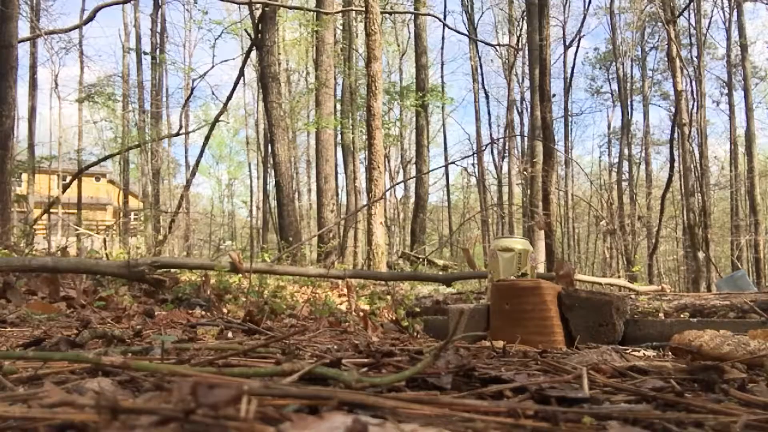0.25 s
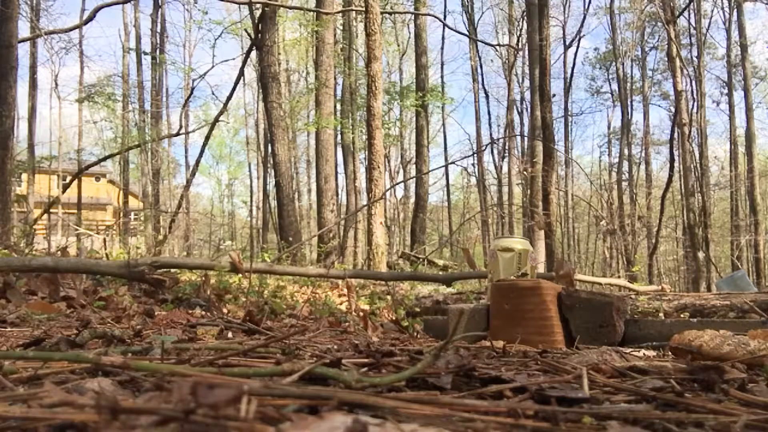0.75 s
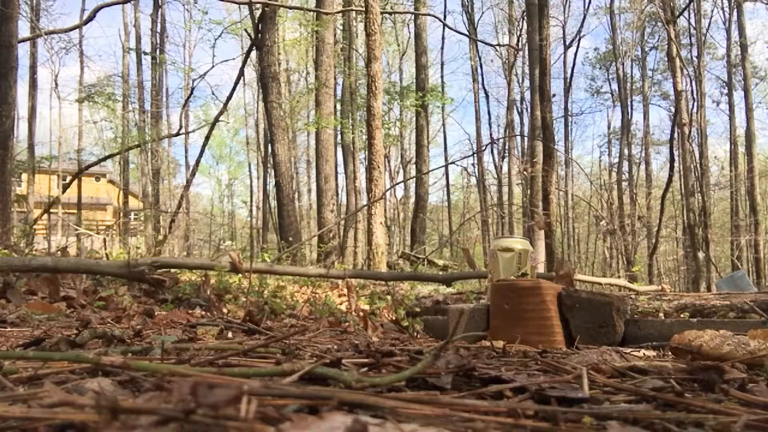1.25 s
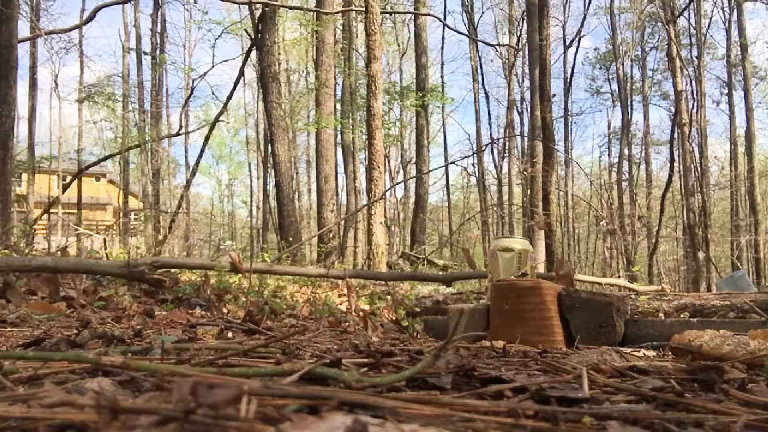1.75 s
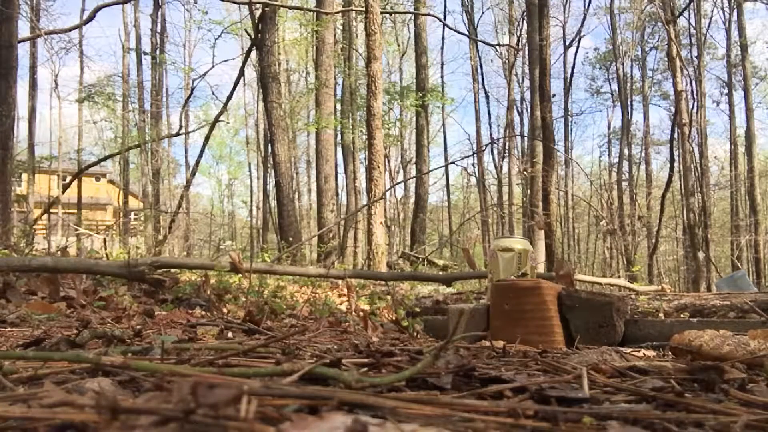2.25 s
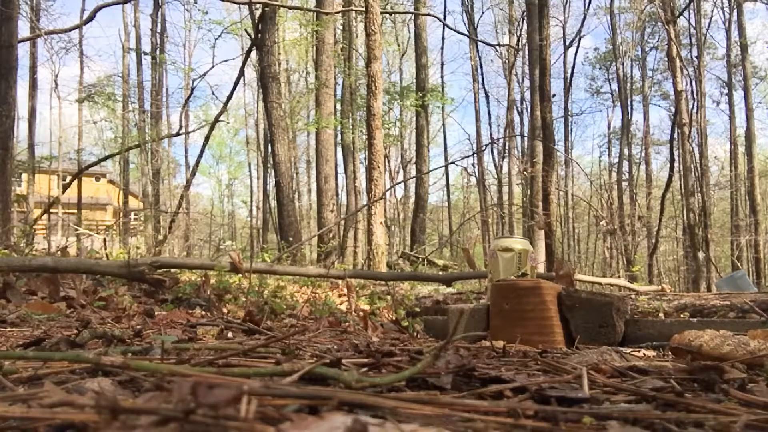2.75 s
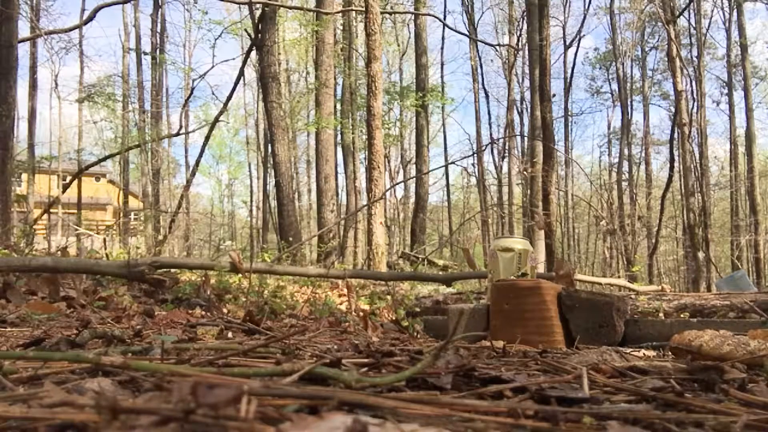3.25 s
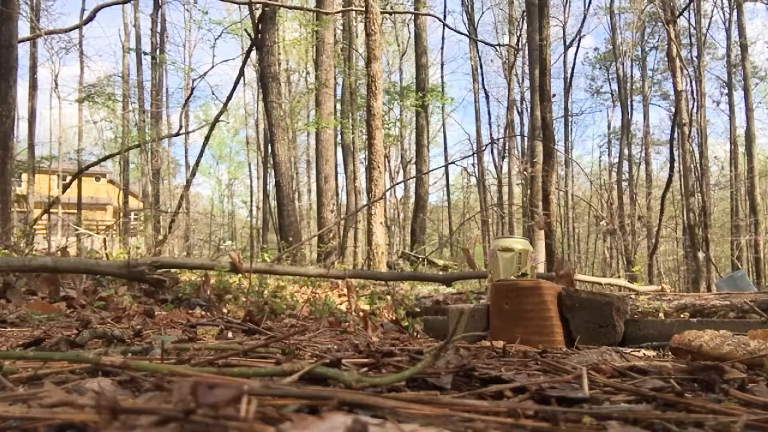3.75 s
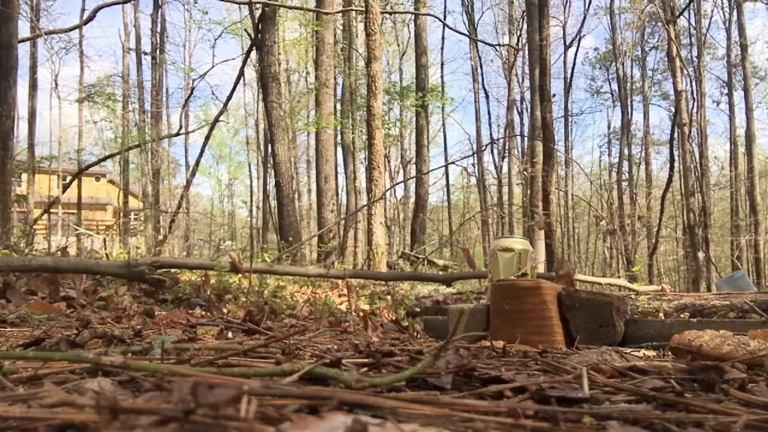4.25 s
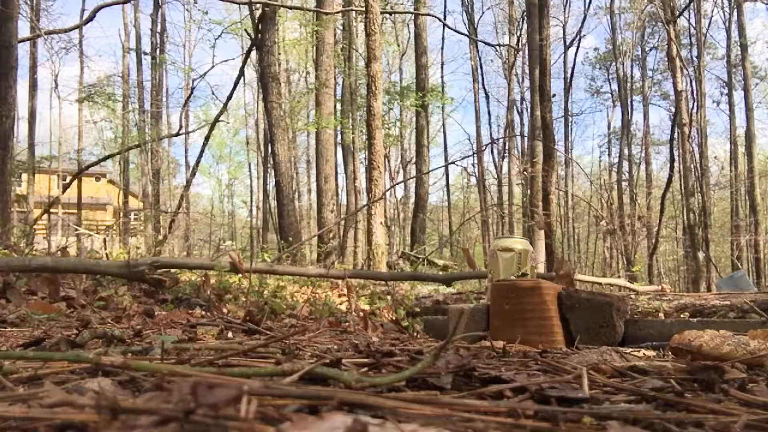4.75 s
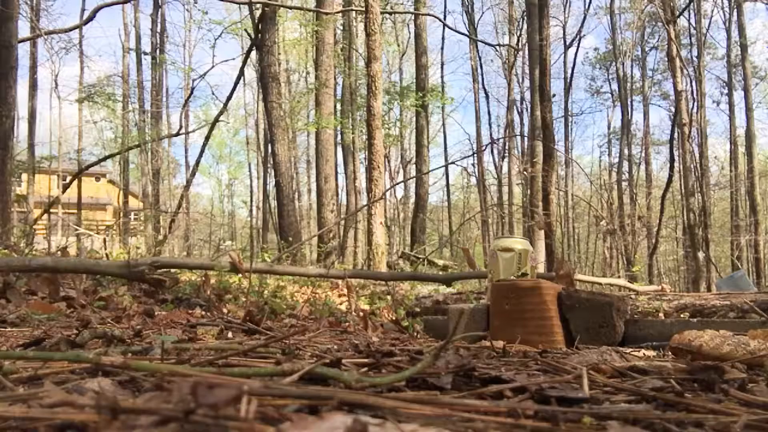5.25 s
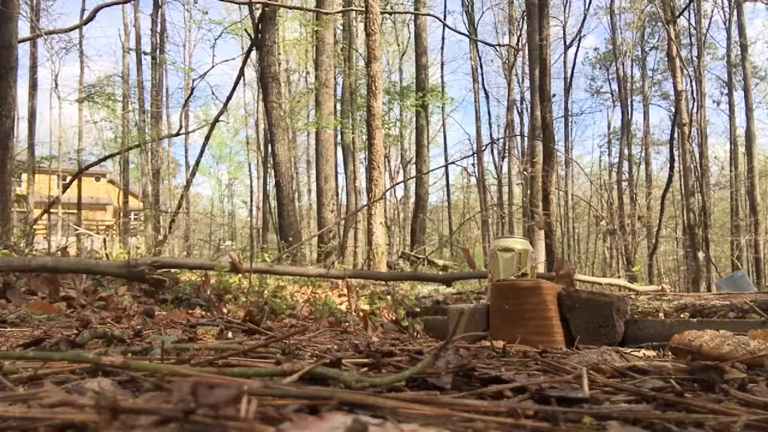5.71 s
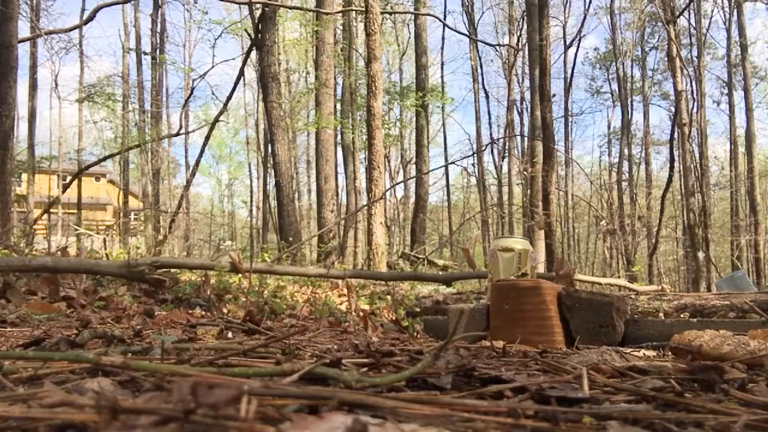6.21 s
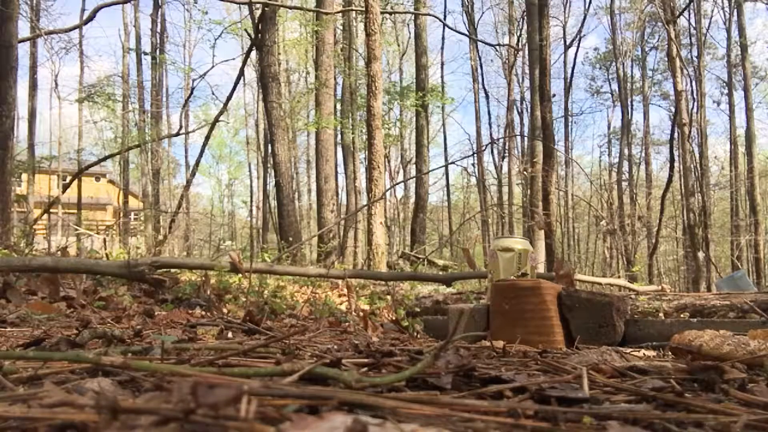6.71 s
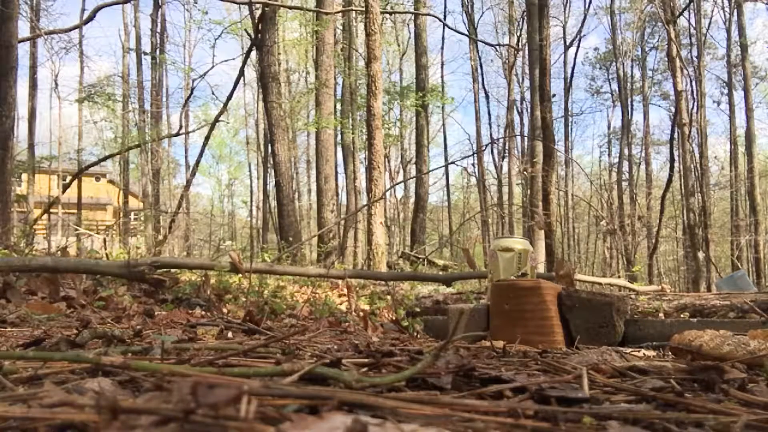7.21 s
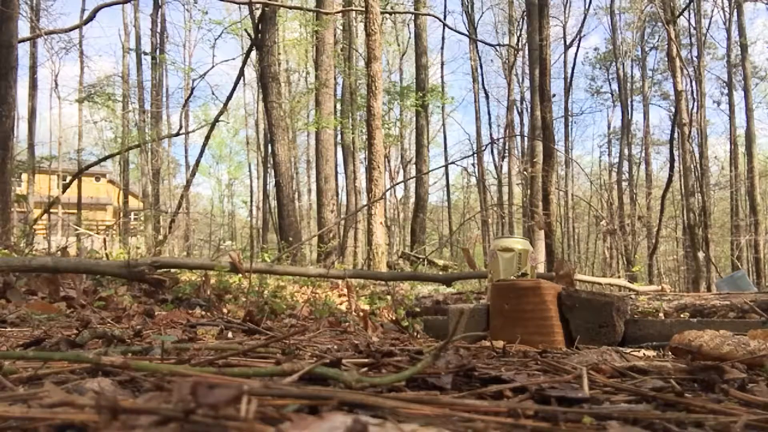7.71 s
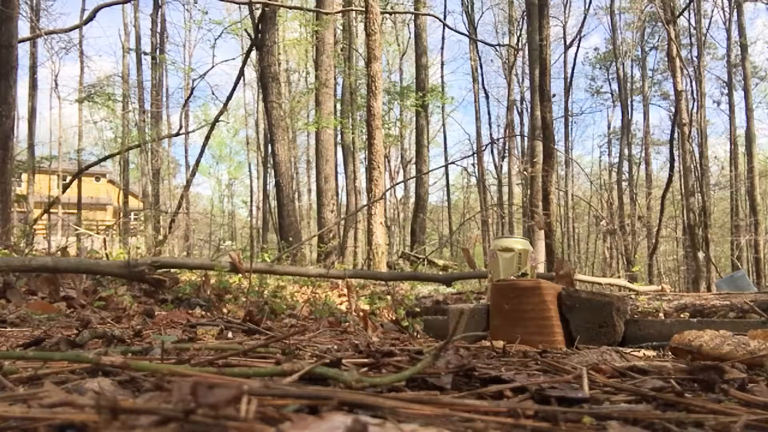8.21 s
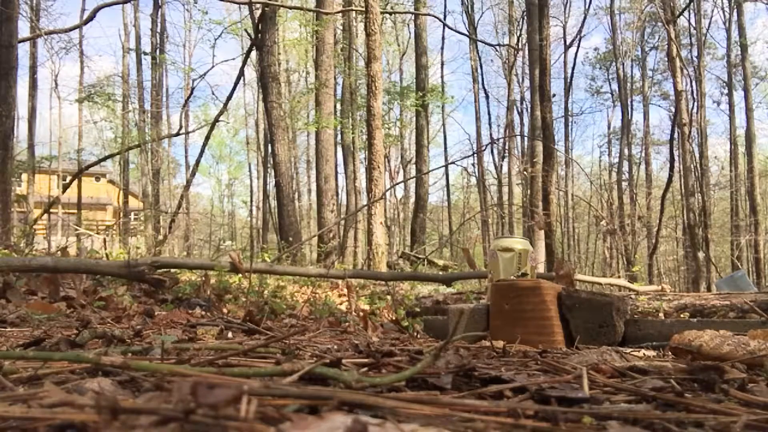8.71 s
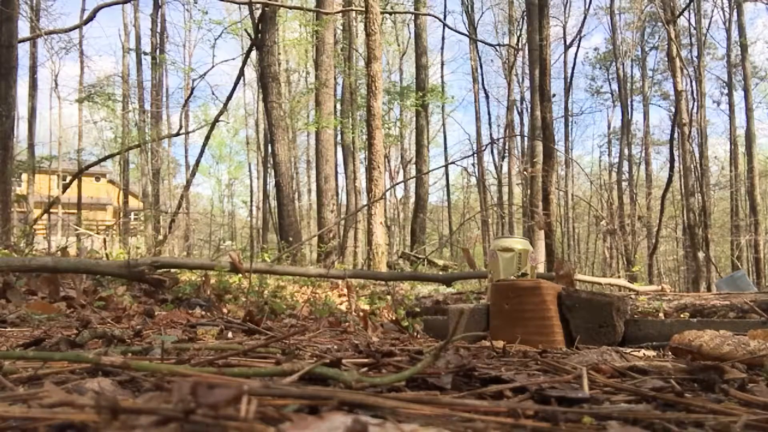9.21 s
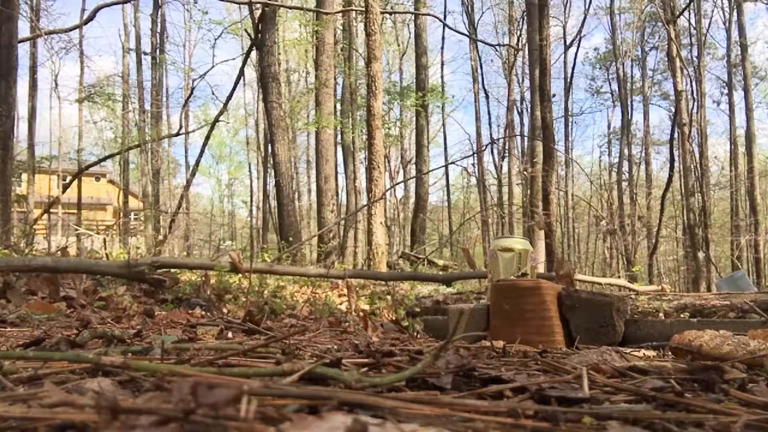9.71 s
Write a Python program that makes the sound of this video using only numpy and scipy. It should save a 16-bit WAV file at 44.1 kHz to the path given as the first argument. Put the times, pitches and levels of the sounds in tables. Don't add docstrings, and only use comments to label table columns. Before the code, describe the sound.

Quiet woodland with soft distant traffic rumble and faint birds. At 0.3 s an air pistol fires close to a small microphone: a tiny hiss, then two extremely sharp, bright cracks about 25 milliseconds apart with a short low puff. Trunks throw back rapid slaps, a duller far return comes near 0.55 s, and a faint tail thins out. Pure, held bird whistles sound at 0.7, 1.0 and 1.25 s, with tiny dry twig ticks around 1.2-1.6 s. Soft handling clicks come at 1.7, 1.9, 3.1, 3.8, 4.3 and 4.6 s; the strongest cluster, at 5.2-5.4 s, has light cloth rustles. Rasping birdsong occurs near 3.3, 5.2 and 7.6 s, and whistles return from 4.4 to 5.3 s. A gliding warble with buzzy trills fills 7.9-9 s while traffic swells slightly around 7.9 s. A small double click lands at 9.6 s.

```python
import sys
import numpy as np
from scipy import signal
from scipy.io import wavfile
from scipy.ndimage import uniform_filter1d

SR = 44100
rng = np.random.default_rng(int(sys.argv[2]) if len(sys.argv) > 2 else 0)


def persist_wave(psi):
    counts = np.round(np.clip(psi, -1, 1) * 32767).astype(np.int16)
    wavfile.write(sys.argv[1], SR, np.atleast_2d(counts).T)


def voltage_ratio(level):
    return 10 ** (np.asarray(level, float) / 20)


N = 439236


def evened(x):
    return x / np.sqrt(np.mean(x ** 2) + 1e-20)


def read(points, hz):
    f, value = np.transpose(points)
    return np.interp(np.log(hz + 1), np.log(f + 1), value)


def add(mix, s, sound):
    part = mix[round(s * SR):][:len(sound)]
    part += sound[:len(part)]


def noise(field_db, length, size):
    frames = length * 4 // size + 6
    hz = np.fft.rfftfreq(size, 1 / SR)[:, None]
    t = np.arange(frames) * size / 4 / SR
    a, b = rng.standard_normal((frames, len(hz), 2)).T
    spectra = (a + 1j * b) * voltage_ratio(field_db(hz, t))
    return signal.istft(spectra, nperseg=size, noverlap=size * 3 // 4)[1][:length]


def flutter(length, span_s):
    width = max(round(span_s * SR), 1)
    smooth = uniform_filter1d(rng.standard_normal(length), width)
    return evened(uniform_filter1d(smooth, width))


def ring(hz, t60, t, onset=0.000083):
    return np.sin(2 * np.pi * hz * t) * voltage_ratio(-60 * t / t60) * (1 - np.exp(-(t / onset) ** 2))


def swelling_ring(hz, t60, t):
    return ring(hz, t60, t, .45 / hz)


def crack(db, hz, t60, fizz_db):
    t = np.arange(SR // 5) / SR
    fizz_band = signal.butter(2, [5970, 13800], "band", fs=SR, output="sos")
    fizz = evened(signal.sosfilt(fizz_band, rng.standard_normal(len(t))))
    fizz = fizz * voltage_ratio(fizz_db - 3.5 - 60 * t / 0.0064)
    undertone = voltage_ratio(-5.5) * swelling_ring(0.73 * hz, t60, t)
    return fizz + voltage_ratio(db) * (swelling_ring(hz, t60, t) + undertone)


def sing(rows, sweep=0, depth_db=4.0, wander_hz=8):
    s, hz, db = np.transpose(rows)
    t = np.arange(s[0], s[-1], 1 / SR)
    slides_per_s = 110 * (1 + 0.6 * flutter(len(t), .007))
    slide = .5 - np.cumsum(slides_per_s) / SR % 1
    hz = np.interp(t, s, hz) + wander_hz * flutter(len(t), 0.0078)
    hz = hz + np.interp(t, s, sweep + 0 * s) * slide
    tone = np.sqrt(2) * np.sin(2 * np.pi * np.cumsum(hz) / SR)
    twinkle_db = depth_db * flutter(len(t), .01)
    soft_ends = signal.windows.tukey(len(t), min(0.036 * SR / len(t), 1))
    return s[0], voltage_ratio(np.interp(t, s, db) + twinkle_db) * tone * soft_ends


def chirp(s, length, first_hz, last_hz, db):
    bend_hz = first_hz + .75 * (last_hz - first_hz)
    rows = [(s, first_hz, db - 4.0), (s + length / 2, bend_hz, db), (s + length, last_hz, db - 3.5)]
    return sing(rows, depth_db=1.5)


def trees(x, t60, turns_per_s):
    t, out = np.arange(SR // 2) / SR, np.zeros(N)
    for k in range(3):
        tail = rng.standard_normal(len(t)) * voltage_ratio(-60 * t / t60)
        turn = np.cos(np.pi * (np.arange(N) * turns_per_s / SR + k / 3)) ** 2
        share = np.sqrt(4 / 3) * turn * np.sqrt(2 / 3)
        out += signal.oaconvolve(x * share, tail / np.linalg.norm(tail))[:N]
    return out


# (f/Hz, level/dB per Hz)
AIR_COLOUR = [(15, -48.5), (25, -17), (43, -6), (111, -3.5), (195, -19), (229, -19.5), (463, -29),
              (560, -30.5), (641, -31), (714, -31.5), (1790, -37.5), (2550, -37), (2840, -36.5),
              (6560, -49.5), (16000, -64.5)]
# (t/s, rumble level/dB, far chorus level/dB)
AIR_DRIFT = [
    (0, -1, 6.5),
    (1, -1.2, 2.5),
    (2.2, 0.13, -4),
    (4, -0.37, -1.5),
    (5.7, 0.27, 3),
    (7, 0, -.5),
    (8, 0.77, 0),
    (9.96, -2.5, -1),
]


def air():
    s, rumble_db, chorus_db = np.transpose(AIR_DRIFT)

    def field_db(hz, t):
        patches = rng.standard_normal((len(t), len(hz))).T
        patches = evened(uniform_filter1d(uniform_filter1d(patches, 8, 0), 16, 1))
        chorus = np.exp(-(np.log2(hz / 2800 + 1e-3) / 0.74) ** 2)
        rumble = 1 / (1 + (hz / 300.4) ** 2)
        passing = 6 * np.exp(-((t - 7.85) / .55) ** 2 - (np.log2(hz / 200 + 1e-3) / .4) ** 2)
        drift = rumble * np.interp(t, s, rumble_db) + chorus * np.interp(t, s, chorus_db)
        return passing + read(AIR_COLOUR, hz) + 0.97 * patches + drift

    return voltage_ratio(-55) * evened(noise(field_db, N, size=2048))


def buzz(s, length, db, hz, sweep_hz, first=1, last=1):
    rows = [(s, first * hz, db - 6.5), (s + .35 * length, hz, db), (s + length, last * hz, db - 9)]
    return sing(rows, sweep_hz, depth_db=1.0)


# (t/s, length/s, top level/dB, middle f/Hz, sweep f/Hz)
BUZZES_FAR = [(0, .3, -68, 2950, 1100), (0, .16, -70, 4300, 1600), (.14, .13, -76, 4800, 2000),
              (1.3, .7, -76, 2570, 300), (2.0, .9, -79, 2590, 400), (2.65, .8, -77, 2510, 400),
              (1.6, .7, -86, 6900, 800), (3.18, .3, -87, 7350, 500), (4.65, .12, -83, 6900, 400),
              (3.8, .45, -79, 2790, 250), (4.2, .35, -79, 2790, 280), (5.45, 1.2, -78, 2080, 500),
              (6.3, .35, -80, 3480, 220), (5.2, .5, -76, 3000, 1500), (5.8, .35, -78, 2900, 1500),
              (6.24, .3, -76, 2610, 200), (6.6, .5, -76, 2610, 220), (7.14, .22, -80, 2380, 250),
              (6.6, .4, -79, 3540, 260), (7.0, .2, -82, 3540, 200), (7.3, .25, -86, 6800, 900),
              (8.0, 1.1, -66, 2700, 900), (8.2, .75, -67, 2790, 320), (7.9, .3, -72, 2580, 350),
              (8.5, 1.0, -74, 3100, 600), (8.3, .9, -75, 2400, 400), (8.05, .55, -74, 4470, 2000),
              (8.62, .3, -74, 4200, 1500), (8.98, .35, -73, 4100, 1300), (8.8, 1.2, -67.5, 2750, 1100),
              (9.3, .65, -75, 4200, 1700), (9.14, .18, -88, 6780, 470), (8.95, .7, -82, 5200, 500)]
# (t/s, length/s, top level/dB, middle f/Hz, sweep f/Hz)
BUZZES_FALLING = [
    (3.66, .25, -76, 3500, 700),
    (3.6, .35, -76, 4200, 900),
    (4.48, .42, -69, 2980, 850),
]


def buzzes():
    out = np.zeros(N)
    for row in BUZZES_FAR:
        add(out, *buzz(*row))
    for row in BUZZES_FALLING:
        add(out, *buzz(*row, first=1.15, last=.9))
    return out


def chatter():
    out = np.zeros(N)
    low_hz, high_hz, level_db = 1940, 3400, -86
    for when, length, pitch, slur, size in rng.random((81, 5)):
        hz = low_hz * (high_hz / low_hz) ** pitch
        last_hz = hz * (.85 + .25 * slur)
        add(out, *chirp(when * N / SR, .03 + 0.053 * length, hz, last_hz, level_db + 4 * size))
    return out


# (t/s, peak level/dB, ring f/Hz, ring t60/s, fizz level/dB)
SHOT_CRACKS = [(0.2882, -34, 3197, .003, -75), (.2885, -41, 1898, .004, -80),
               (.2990, -41, 1551, 0.0065, -65), (0.3048, -37.5, 3502, .008, -50),
               (0.308, -28.5, 2603, .006, -45), (0.3095, -2.5, 3200, .0035, -27.5),
               (0.312, -17, 3300, .006, -30), (0.3133, -11, 7200, .004, -24.5),
               (.3138, -13, 4300, .004, -30), (.3145, -10, 3300, .006, -30.5),
               (0.3139, -11, 2800, .006, -23), (0.3179, -13, 2998, .008, -27.5),
               (0.3212, -8, 3201, .003, -36), (.3257, -20, 3503, .008, -26.5),
               (.3302, -18, 4500, .006, -26.5), (.3329, -3.5, 3212, .0025, -24),
               (0.334, -13.5, 4200, .004, -28), (0.3351, -6.5, 5800, 0.003, -18),
               (.3356, -3, 2400, .004, -30), (0.3385, -16.5, 2701, .008, -30), (0.34, -19, 2596, .008, -29),
               (.3450, -23.5, 4007, 0.0028, -38.5)]
# (t/s, peak level/dB, f/Hz, t60/s)
SHOT_BODY = [(.3094, -22, 1150, .007), (.3095, -12, 1750, .004), (.3110, -25, 640, .02),
             (.3105, -22, 500, .025), (.3110, -24, 390, .025), (.3375, -25, 480, .02),
             (.3136, -13, 1750, .018), (.3148, -18, 1200, .012), (.3157, -19, 1700, .012),
             (.3177, -14, 1750, .01), (.3330, -14, 1700, .009), (.3355, -10, 1420, .006),
             (.3390, -21, 1420, .02), (.3380, -24, 640, .015), (.3374, -15, 1010, .03)]
# (t/s, peak level/dB, f/Hz, t60/s)
SHOT_PUSHES = [
    (0.3107, -26, -300, 0.0073),
    (0.312, -13.5, 147, 0.051),
    (0.312, -12, 250, 0.024),
    (0.337, -18, 116.5, .028),
    (0.338, -23, 263, .02),
    (0.347, -31, 49.5, .08),
]


def shot():
    out, t = np.zeros(N), np.arange(SR // 5) / SR
    for s, db, hz, t60, fizz_db in SHOT_CRACKS:
        add(out, s, crack(db, hz, t60, fizz_db))
    for s, db, hz, t60 in SHOT_BODY:
        add(out, s, -voltage_ratio(db) * swelling_ring(hz, t60, t))
    for s, db, hz, t60 in SHOT_PUSHES:
        add(out, s, voltage_ratio(db) * ring(hz, t60, t))
    return out


def valve():
    out = np.zeros(N)
    start, end = .292, .3085
    hz, width_hz, db = 5700, 600, -48
    length = round((end - start) * SR)
    hiss = noise(lambda f, u: -12 * np.abs(f - hz) / width_hz + 0 * u, length, size=128)
    add(out, start, voltage_ratio(db) * evened(hiss) * np.linspace(.2, 1, length))
    return out


SCATTER_STARTS = [.3075, .33, .35, .541, .539, .45]
# (rms level/dB, rise/s, hold/s, factor on the wood's decay, tilt/dB per octave)
SCATTER_RETURNS = [
    (-27, .003, 0.033, 0.046, 3.5),
    (-41, 0.011, 0.043, 0.36, 3),
    (-46, .04, 0.13, 0.87, 1),
    (-46, .012, .07, .8, -1.3),
    (-50, .005, .016, .12, 1.5),
    (-58.5, 0.35, 0.21, 3.26, -1.5),
]
# (f/Hz, level/dB per Hz)
SCATTER_COLOUR = [(180, -46.5), (300, -17.5), (440, -17), (502, -11), (537, -13), (614, -14.5), (978, -4.5),
                  (1530, 0), (2930, -0.5), (4830, -8), (6100, -6.5), (8360, -20.5), (12900, -33.5),
                  (16000, -38)]
# (f/Hz, t60/s)
WOOD_DECAY = [(300, 0.82), (1000, 1.2), (2500, 1.15), (5000, 0.79), (8000, 0.65), (10000, 0.73),
              (15000, 1.8)]


def returns():
    out, t = np.zeros(N), np.arange(2 * SR) / SR
    for s, (db, rise, hold, factor, tilt_db) in zip(SCATTER_STARTS, SCATTER_RETURNS):

        def field_db(hz, u):
            colour = read(SCATTER_COLOUR, hz) + tilt_db * np.log2(hz / 2500 + .01)
            decay = -60 * np.maximum(u - hold, 0) / (factor * read(WOOD_DECAY, hz))
            gate = -12 * (hz > 8600) * (s + u > .75)
            return colour + decay + gate

        tail = noise(field_db, len(t), size=128)
        tail = tail * voltage_ratio(1.3 * flutter(len(t), .002))
        add(out, s, voltage_ratio(db) * tail / np.std(tail[:600]) * np.minimum(t / rise, 1))
    return out


# (t/s, peak level/dB)
TRUNK_ECHOES = [(.3607, -17.5), (.3655, -15.5), (.3700, -23), (.3762, -26), (.3833, -26.5), (.3864, -19.5),
                (.3924, -27.5), (.4064, -26), (.4098, -34), (.4127, -31), (.4252, -28), (.4298, -34),
                (.4566, -32.5), (.5025, -32.5), (.5430, -30), (.5470, -34), (.5530, -33)]


def trunks():
    out = np.zeros(N)
    for s, db in TRUNK_ECHOES:
        hz = 2771 * (1 + 0.18 * rng.uniform(-0.74, 1))
        add(out, s, crack(db, hz, 0.0034, db - 27))
    return out


# (t/s, length/s, f/Hz, top level/dB, glide-in f/Hz)
HELD_NOTES = [
    (.69, .2, 3872, -62, 0),
    (.985, .205, 5878, -65, 330),
    (1.25, .23, 3570, -68, -60),
    (4.385, .37, 5825, -68, 330),
    (4.775, .23, 3870, -62.5, 0),
    (5.09, .24, 5890, -67.5, 330),
]


def held_whistles():
    out = np.zeros(N)
    rise_s, stop_s, echo_s, glide_s = .14, .02, .34, .028
    for s, length, hz, db, glide_hz in HELD_NOTES:
        t = np.arange(0, length + echo_s, .01)
        start_db = -9 if glide_hz > 0 else -5
        level_db = np.interp(t, [0, rise_s, length, length + stop_s, length + echo_s],
                             [start_db, 0, -3.5, -12, -25])
        pitch_hz = hz + glide_hz * np.exp(-t / glide_s)
        add(out, *sing(np.transpose([s + t, pitch_hz, db + level_db]), depth_db=3.2, wander_hz=14))
    return out


# (t/s, peak level/dB)
TWIG_TICKS = [
    (1.227, -70),
    (1.326, -66),
    (1.341, -65),
    (1.372, -67),
    (1.394, -66),
    (1.420, -67),
    (1.469, -67),
    (1.508, -67),
    (1.625, -70),
]


def ticks():
    out = np.zeros(N)
    for s, db in TWIG_TICKS:
        add(out, s, crack(db, 7200, .003, db - 5))
    return out


# (t/s, peak level/dB, body f/Hz, brightness/dB, t60/s)
HANDLING_CLICKS = [(1.6902, -61, 3600, -29, 0.03), (1.9197, -62, 1784, -26, 0.028),
                   (3.1069, -53, 2063, -46, 0.039), (3.7628, -45.5, 3775, -31, 0.026),
                   (4.2688, -52.5, 3543, -28, 0.031), (4.642, -52, 2876, -47, 0.031),
                   (5.1965, -42, 4050, -16, 0.019), (5.2168, -50, 2200, -30, .015),
                   (5.221, -48, 4240, -28, .03), (5.2838, -37.5, 3470, -10, 0.01),
                   (5.29, -40.5, 4350, -20, 0.016), (5.292, -45, 1500, -30, .02),
                   (5.305, -50, 3590, -20, .015), (5.308, -47, 3320, -22, .024),
                   (5.4407, -53, 2070, -22, 0.028), (9.576, -52, 3000, -45, .015),
                   (9.5795, -44, 3900, -31, .02), (9.581, -45, 2040, -40, 0.03),
                   (9.6015, -50, 2100, -45, .02), (9.605, -51, 2300, -45, .02)]
# (f/Hz, level/dB per Hz)
RATTLE_COLOUR = [(530, -55), (900, -10), (2020, -7), (3150, -3), (4200, -5), (6030, -9), (6330, -9),
                 (7490, -8.5), (10500, -16), (13000, -11), (16000, -18)]


def clicks():
    out, t = np.zeros(N), np.arange(SR // 4) / SR
    for s, db, hz, bright_db, t60 in HANDLING_CLICKS:

        def field_db(f, u):
            return read(RATTLE_COLOUR, f) + (bright_db + 14.0) * np.clip(f / 12000, 0, 1.2) + 0 * u

        rattle = evened(noise(field_db, len(t), size=256))
        fade = voltage_ratio(-60 * t / t60) + voltage_ratio(-21 - 60 * t / .35)
        rattle = rattle * fade * np.minimum(t / 0.00061, 1)
        add(out, s, voltage_ratio(db - 9) * (rattle + 0.78 * ring(hz, 2.0 * t60, t)))
    return out


# (t/s, first f/Hz, level/dB)
HOOK_NOTES = [(2.1, 2550, -79), (2.67, 3500, -80), (3.82, 3150, -76), (4.94, 3300, -78), (5.485, 3100, -69),
              (5.87, 3000, -69), (5.04, 4600, -80), (7.3, 2400, -79), (6.235, 2950, -68),
              (6.395, 1970, -74), (6.595, 3000, -70), (6.74, 1950, -72), (7.07, 9300, -86),
              (7.085, 2800, -72), (8.075, 2900, -71)]
# (t/s, first f/Hz, level/dB)
PIP_NOTES = [(2.2, 2080, -79), (2.45, 4280, -78), (2.82, 3900, -80), (5.53, 2300, -71), (5.6, 2120, -75),
             (6.7, 1960, -75), (7.19, 1820, -73), (7.23, 1780, -75), (7.11, 2420, -78), (7.585, 2420, -74),
             (7.68, 1800, -76), (6.04, 1790, -78), (5.72, 2760, -77)]
# (t/s, first f/Hz, level/dB)
DIVE_NOTES = [
    (2.385, 5100, -75),
    (4.78, 4500, -70),
    (5.05, 4100, -67),
    (5.98, 2950, -72),
    (6.015, 2400, -75),
    (7.895, 2720, -66),
    (8.205, 2700, -63),
    (8.49, 2720, -62),
    (8.54, 2700, -70),
]
# (t/s, first f/Hz, level/dB)
LIFT_NOTES = [
    (2.59, 3150, -80),
    (6.11, 1980, -77),
    (6.28, 1960, -70),
    (6.475, 1950, -72),
    (8.24, 2600, -64),
]


def chirps():
    out = np.zeros(N)
    # notes, length in s, last pitch over first
    kinds = ((HOOK_NOTES, .047, .86), (PIP_NOTES, .06, .975), (DIVE_NOTES, .042, .81), (LIFT_NOTES, .07, 1.11))
    for notes, length, bend in kinds:
        for s, hz, db in notes:
            add(out, *chirp(s, length, hz, hz * bend, db))
    return out


# (t/s, top level/dB)
RASP_SONGS = [
    (3.26, -66),
    (5.22, -67),
    (7.62, -68.5),
]
RASP_SWEEPS = (300, 950, 1100, 1200)


def rasps():
    out = np.zeros(N)
    rise_s, hold_s, release_s = .1, .22, 0.39
    for s, db in RASP_SONGS:
        t = s + np.cumsum([0, rise_s, hold_s, release_s])
        hz = 4450 * np.array([.87, 1, 1, .86])
        level_db = db + np.array([-10.5, 0, -2.5, -16])
        add(out, *sing(np.transpose([t, hz, level_db]), np.array(RASP_SWEEPS), depth_db=-1.5))
        add(out, *buzz(s + .3, .4, db - 8, 5350, 1200))
    return out


# (t/s, rise/s, release/s, f/Hz, top level/dB)
WHISTLE_NOTES = [(3.35, .04, .7, 4850, -78), (5.32, .08, .7, 5050, -77), (5.35, .1, 1.1, 3540, -73),
                 (5.95, .066, .15, 7040, -88), (6.3, .4, .4, 3535, -84), (6.55, .06, .2, 6950, -90),
                 (7.72, .04, .5, 5010, -76), (8.17, .04, .5, 5320, -83), (8.56, .035, .5, 5325, -85),
                 (8.94, .05, .6, 5330, -85), (9.36, .03, .4, 5340, -83), (9.54, .13, 2.2, 6310, -83),
                 (9.92, .03, .3, 4000, -77)]


def whistles():
    out = np.zeros(N)
    for s, rise, release, hz, db in WHISTLE_NOTES:
        rows = [(s, hz, db - 8), (s + rise, hz, db), (s + rise + release, hz, db - 22)]
        add(out, *sing(rows, depth_db=4, wander_hz=22))
    return out


# (t/s, length/s, level/dB)
SLEEVE_RUSTLES = [
    (3.47, .06, -89),
    (5.18, .05, -82),
    (5.285, .11, -79.5),
    (5.84, .1, -82.5),
    (5.4, .08, -88),
]


def rustles():
    out, high = np.zeros(N), signal.butter(2, 6500, "high", fs=SR, output="sos")
    for s, length, db in SLEEVE_RUSTLES:
        size = round(length * SR)
        grain = signal.sosfilt(high, rng.standard_normal(size)) * voltage_ratio(db + 2.5 * flutter(size, .003))
        add(out, s, grain * signal.windows.tukey(size, .7))
    return out


# (t/s, length/s, first f/Hz, last f/Hz, level/dB)
WARBLE_STRANDS = [(7.72, .14, 2850, 2830, -78), (7.85, .04, 2980, 2980, -72), (7.855, .05, 2760, 2640, -68),
                  (7.965, .115, 2900, 2900, -70), (8.12, .105, 2770, 2740, -58.5),
                  (8.26, .14, 2880, 2860, -64), (8.3, .12, 2760, 2700, -65),
                  (8.415, .08, 2750, 2770, -59.5), (8.51, .045, 2700, 2750, -61),
                  (8.575, .06, 2740, 2800, -61.5), (8.66, .07, 2800, 2730, -63),
                  (8.74, .095, 2770, 2830, -62), (8.86, .06, 2760, 2840, -65),
                  (7.885, .035, 2700, 2600, -63), (8.4, .06, 2860, 2880, -65), (8.56, .08, 2850, 2880, -66),
                  (8.7, .1, 2880, 2860, -66)]


def warble():
    out = np.zeros(N)
    for s, length, first_hz, last_hz, db in WARBLE_STRANDS:
        middle_hz = (first_hz + last_hz) / 2
        rows = [(s, first_hz, db - 3), (s + length / 2, middle_hz, db), (s + length, last_hz, db)]
        add(out, *sing(rows, depth_db=2.5, wander_hz=35))
    return out


def birds():
    near = chatter() + chirps() + warble()
    clear = held_whistles() + whistles()
    far = buzzes() + rasps()
    near_echo = voltage_ratio(-4) * trees(near + voltage_ratio(-7) * clear, .6, 7)
    return near + clear + near_echo + .12 * far + trees(far, .22, 34)


# (t/s, length/s, low f/Hz, top f/Hz)
THINNED_BANDS = [
    (1.045, .17, 6150, 9400),
    (4.49, .16, 6100, 8800),
]


def thinned(x):
    hz, t, z = signal.stft(x, SR, nperseg=1024, noverlap=768)
    for s, length, low_hz, top_hz in THINNED_BANDS:
        reach = np.sqrt(np.clip(1 - np.abs(2 * (t - s) / length - 1), 0, 1))
        above = hz[:, None] > low_hz
        below = hz[:, None] < low_hz + (top_hz - low_hz) * reach
        z = z * np.where(above & below, voltage_ratio(-25), 1)
    return signal.istft(z, SR, nperseg=1024, noverlap=768)[1][:, :N]


def scene():
    pistol = shot() + valve() + returns() + trunks()
    handling = clicks() + rustles()
    return (air() + birds() + pistol + ticks() + handling)[None]


def top_cut(x):
    return signal.sosfilt(signal.butter(12, 16460, fs=SR, output="sos"), x)


def record(dry):
    heard = signal.sosfilt(signal.butter(3, 46.6, "high", fs=SR, output="sos"), dry)
    heard = heard + voltage_ratio(-92) * rng.standard_normal(N)
    heard = signal.oaconvolve(heard, signal.firwin(255, 16200, fs=SR)[None], "same")
    return top_cut(thinned(heard))


dry = scene()
out = record(dry)
persist_wave(out)
```